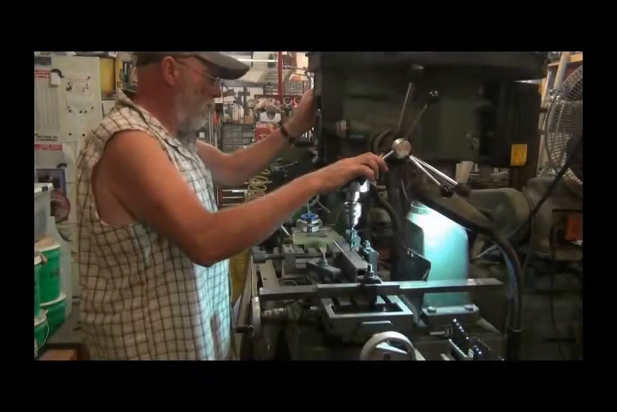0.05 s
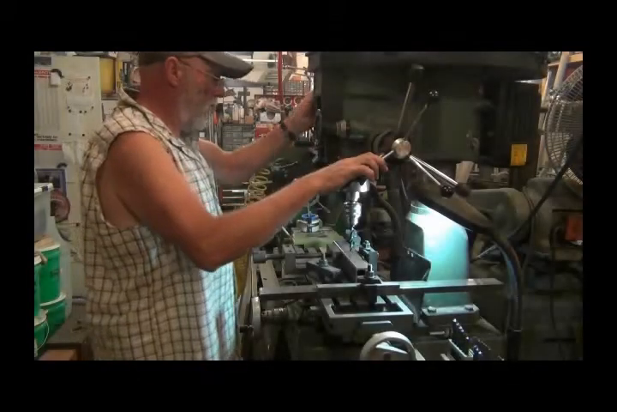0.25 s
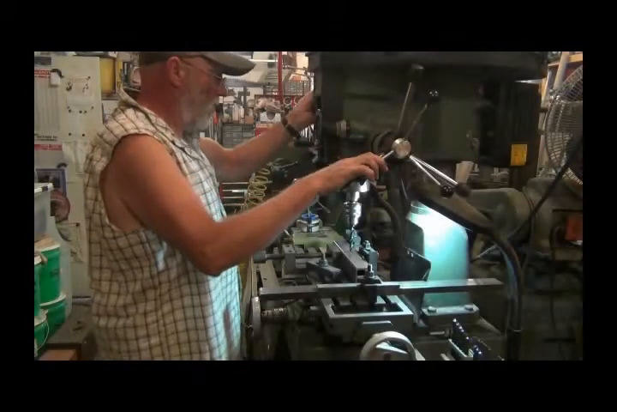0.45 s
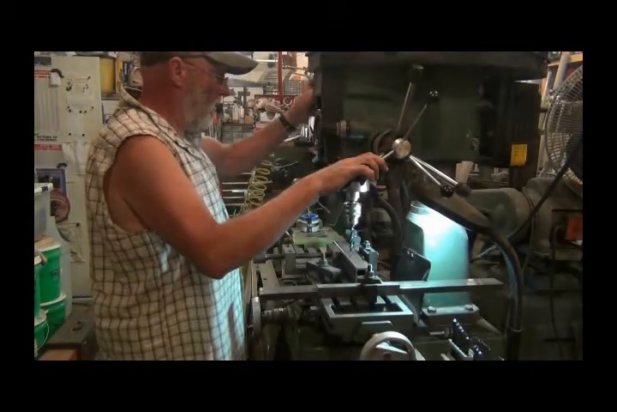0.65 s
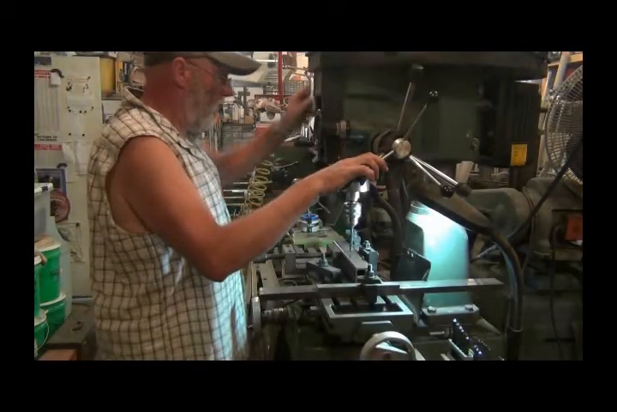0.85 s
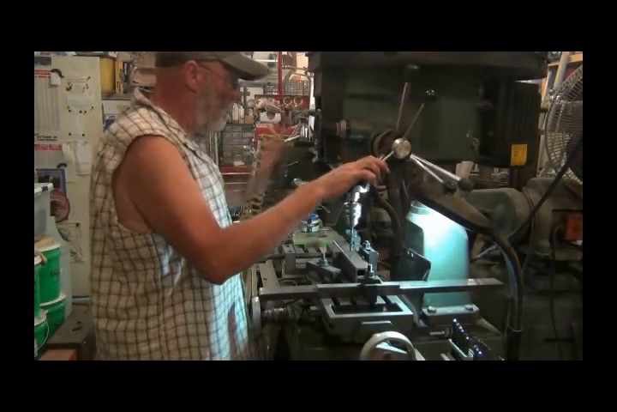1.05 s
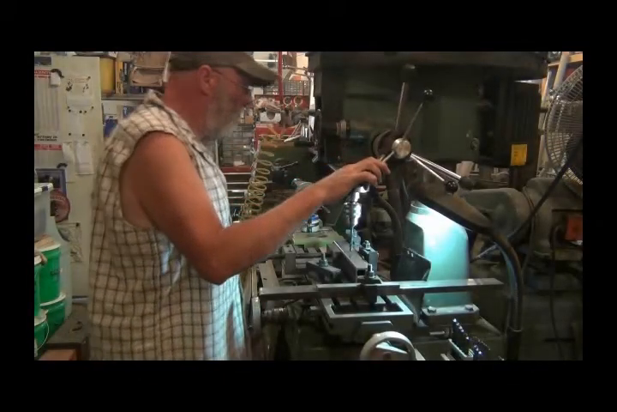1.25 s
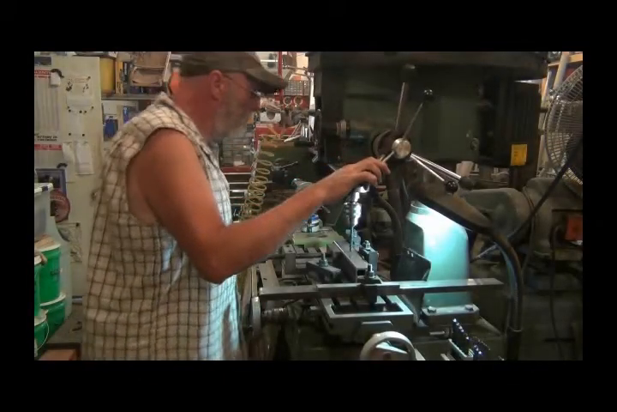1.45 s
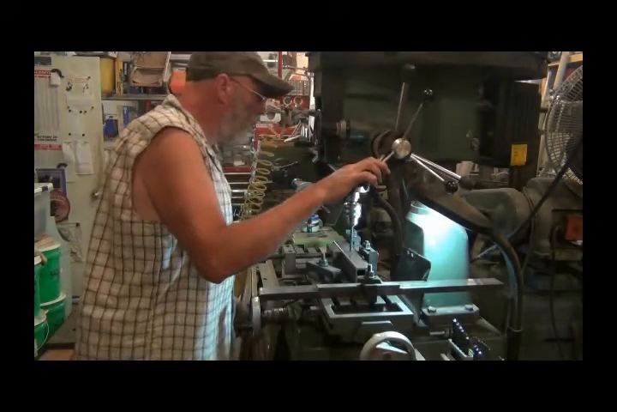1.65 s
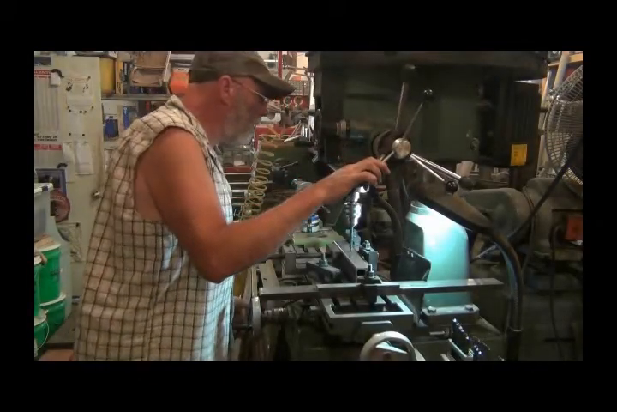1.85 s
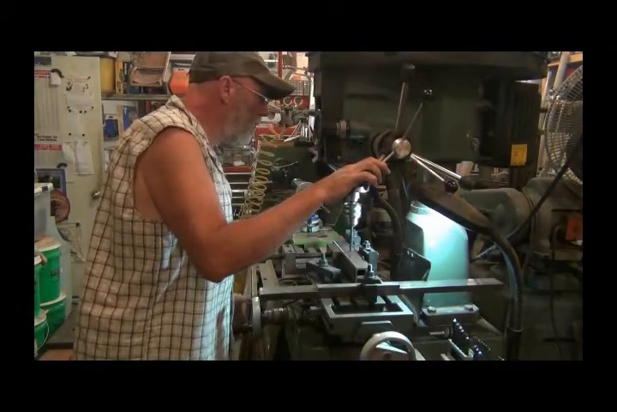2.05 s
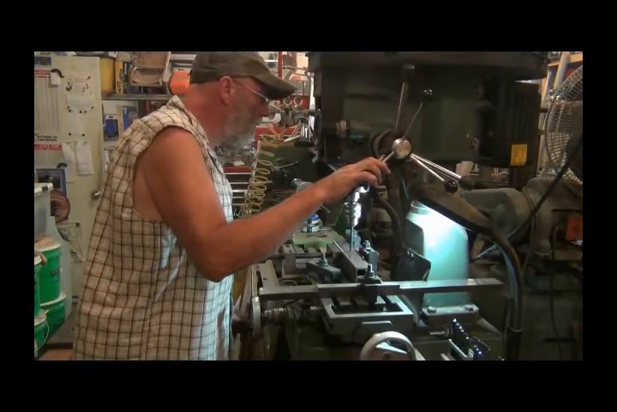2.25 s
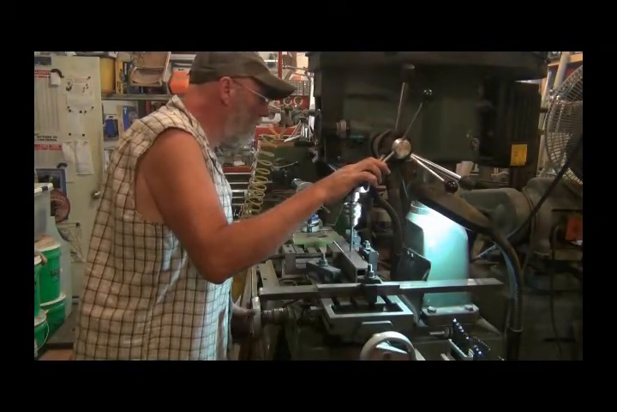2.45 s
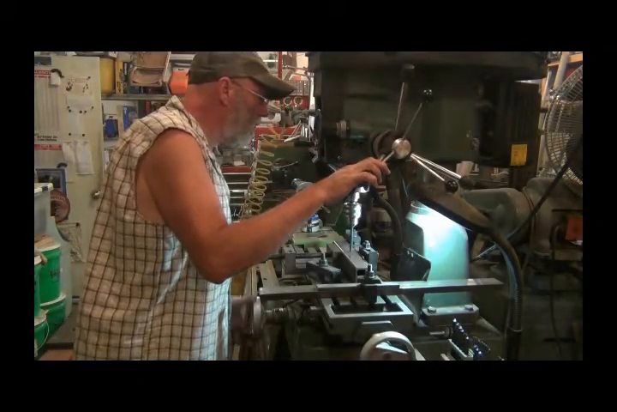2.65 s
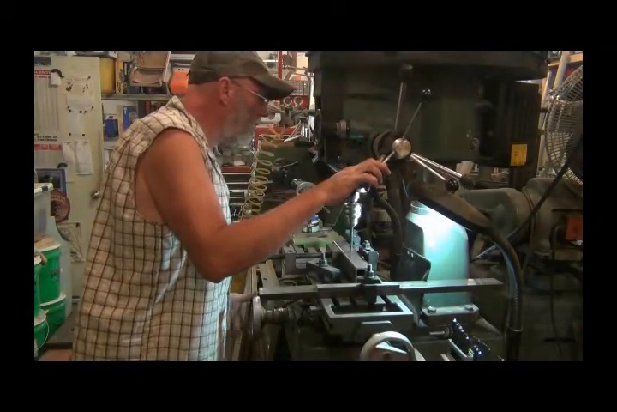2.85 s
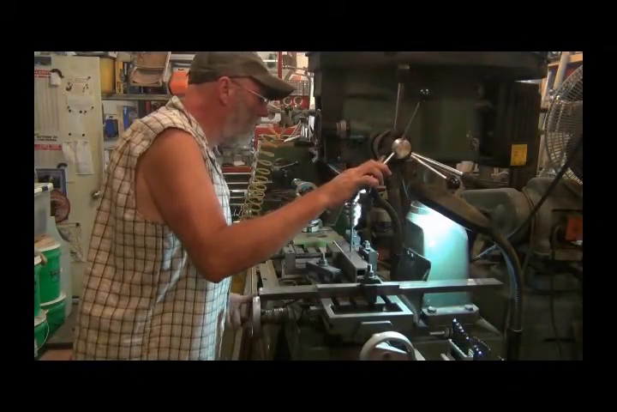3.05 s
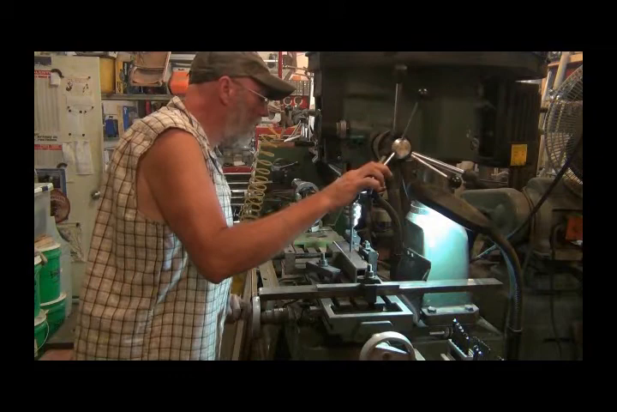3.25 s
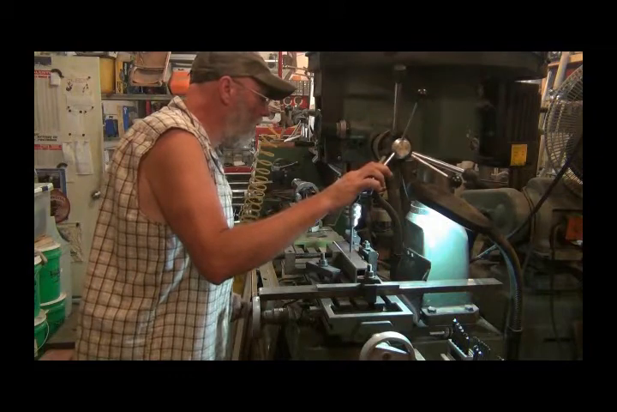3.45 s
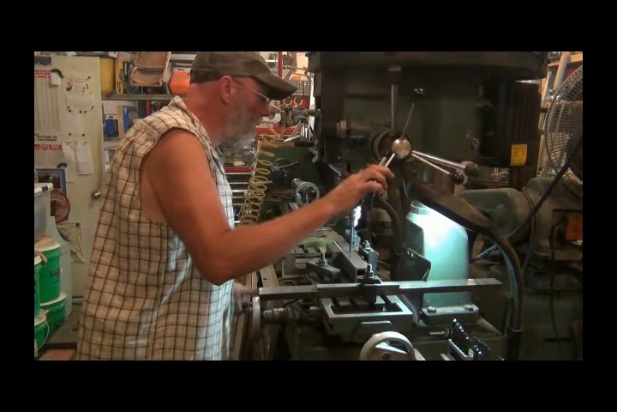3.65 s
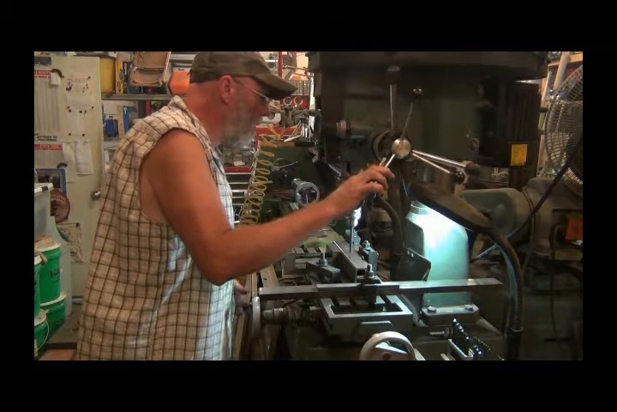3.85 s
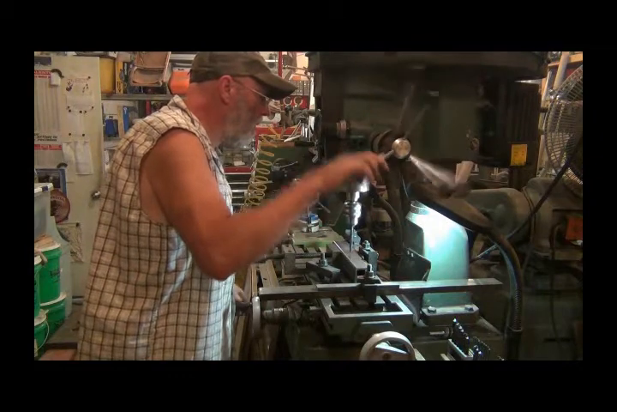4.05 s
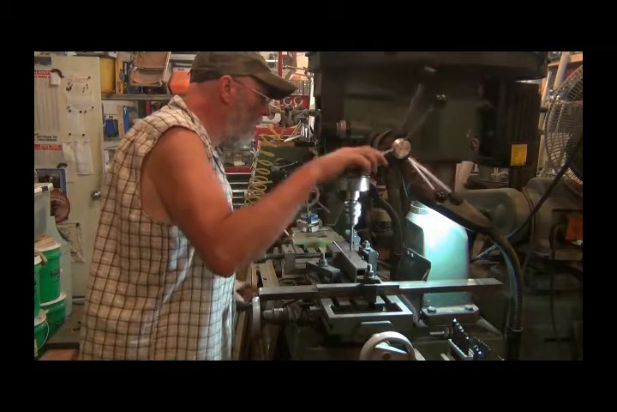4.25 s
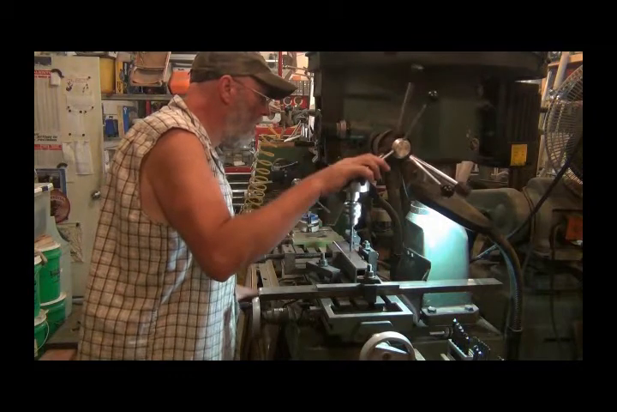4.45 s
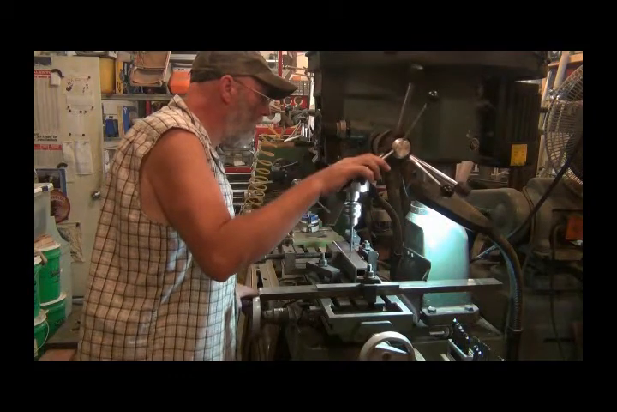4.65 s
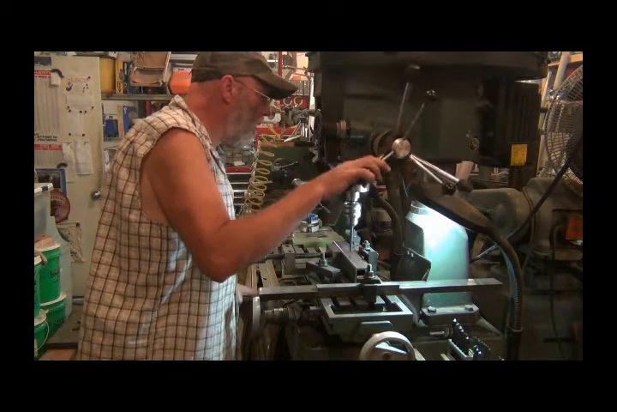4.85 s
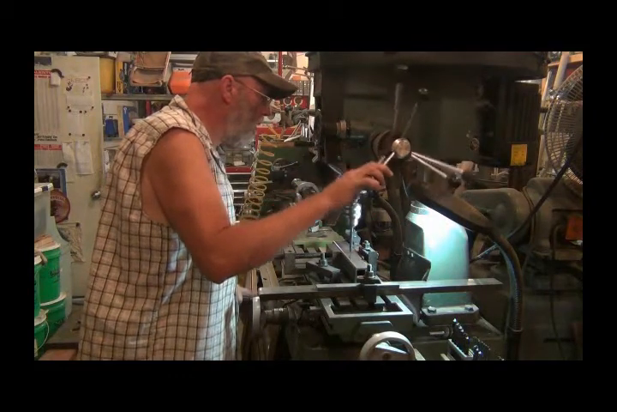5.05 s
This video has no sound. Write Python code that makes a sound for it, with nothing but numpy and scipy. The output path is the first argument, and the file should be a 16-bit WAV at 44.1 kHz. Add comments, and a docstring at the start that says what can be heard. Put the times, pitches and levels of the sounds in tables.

```python
"""A hand scuffs the sheet-steel cover of a belt-driven drill in a cluttered workshop; the switch and starter clack.
Then the windings hum at even mains multiples, and noise through resonances makes the cast frame rumble.
The belt whirrs as shaped noise; the loose spindle rattles each half turn as bursts that ring steel parts.
Soft gliding grunts, brief rising tones, a quiet shop and the echoes of its walls complete the scene."""
import sys
import numpy as np
from scipy import signal
from scipy.fft import rfft, irfft, next_fast_len
from scipy.io import wavfile
from scipy.ndimage import uniform_filter1d

SR = 44100
rng = np.random.default_rng(int(sys.argv[2]) if len(sys.argv) > 2 else 0)


def dump(signal):
    """Clip the signal to [-1, 1] and save it as 16-bit WAV at the path in sys.argv[1]."""
    limited = np.clip(np.atleast_2d(signal).T, -1, 1)
    pcm = np.round(limited * 32767).astype(np.int16)
    wavfile.write(sys.argv[1], SR, pcm)


N = 225703
T = np.arange(N) / SR  # time in s
MAINS_HZ, TURN_HZ = 59.98, 17.2  # supply frequency, spindle turns per second

# Resonances of the sheet cover. Each row: frequency in Hz, width in Hz, level in dB.
COVER = [(676, 32, 3), (845, 110, 0), (1020, 64, 1.5), (1183, 16, 4), (1333, 40, -6), (1470, 100, -4.5)]
# Steel parts that ring when struck. Each row: frequency in Hz, width in Hz, level in dB.
STEEL = [(2860, 310, -2), (4606, 166, 6.5), (5270, 300, 2.5), (6370, 590, 1.5), (7630, 900, -4),
         (9160, 510, 0), (10160, 490, -5), (11070, 1170, -6)]
# A fingertip tick, then switch and starter. Each row: start in seconds, level in dB,
# treble against that level in dB, decay by 60 dB in seconds.
CLACKS = [(0.207, -37.5, -11, 0.12), (0.7103, -17.5, -14.5, 0.3), (0.742, -23, -21, 0.16),
          (.874, -17, 3, 0.17), (0.885, -20, 4.5, 0.28)]


def undb(db):
    """Decibels are logarithmic: 20 dB is a tenfold amplitude gain."""
    return 10 ** (np.asarray(db) / 20)


def level(x, db):
    """Root-mean-square amplitude measures strength: scale x to db."""
    return x * undb(db) / np.sqrt(np.mean(x ** 2))


def colour(x, table, share=1):
    """Spectral shaping: weight the spectrum by (Hz, dB) points joined on a log-frequency axis."""
    hz, db = np.transpose(table)
    size = next_fast_len(N + SR // 4)
    log_f = np.log(np.arange(size // 2 + 1) * SR / size + 1)
    gain = undb(share * np.interp(log_f, np.log(hz), db))
    return irfft(rfft(x, size) * gain, size)[:N]


def ring(x, modes):
    """Modal superposition: resonances (Hz, width Hz, dB) in parallel, with alternating sign."""
    total = 0
    for k, (hz, width, db) in enumerate(modes):
        b, a = signal.iirpeak(hz, hz / width, SR)
        total = total + (-1) ** k * undb(db) * signal.lfilter(b, a, x)
    return total


def walk(rate):
    """Slow random fluctuation: levels held 1 / rate s and averaged twice; spread near 1."""
    k = int(SR / rate)
    held = np.repeat(rng.standard_normal(N // k + 1), k)
    return 1.447 * uniform_filter1d(uniform_filter1d(held, k), k)[:N]


def grit(spread_db):
    """Impulsive contact noise: dense clicks of uneven size."""
    size_db = spread_db * rng.exponential(1, N)
    return level(rng.standard_normal(N) * undb(size_db), 0)


def bursts(times, db, rise_s, t60_s):
    """Transient envelope: blows build over rise_s, then decay exponentially by 60 dB in t60_s."""
    out = np.zeros(N)
    for s, gain, t60 in zip(*np.broadcast_arrays(times, undb(db), t60_s)):
        i = int(s * SR)
        u = T[:min(N - i, int(1.5 * t60 * SR))]
        decay = np.exp(-np.log(1000) * u / t60)
        out[i:i + len(u)] += gain * (1 - np.exp(-u / rise_s)) * decay
    return out


def curves(table, before_db=-90):
    """Linear interpolation in dB: columns against time, fading in just ahead of the first row."""
    s, *columns = np.transpose(table)
    times = np.r_[s[0] - .006, s]
    return [np.interp(T, times, np.r_[before_db, column]) for column in columns]


def shop():
    """Stationary background: shaped noise for air and hiss, a lamp ballast at twice the mains."""
    # Spectrum of the quiet shop. Each row: frequency in Hz, density in dB per Hz.
    shop_spectrum = [(30, 0), (60, -8), (120, -10), (220, -2), (480, -4), (900, -5), (1400, -7),
                     (2700, -14.5), (10800, -19.5), (12500, -19)]
    air = level(colour(rng.standard_normal(N), shop_spectrum), -54.5)
    ballast = level(np.sin(4 * np.pi * MAINS_HZ * T), -67.5)
    return air + ballast


def walls(x):
    """Diffuse reverberation: convolve with exponentially decaying noise."""
    t60_s, first_echo_s = 0.3, .004
    u = T[:int(t60_s * SR)]
    decay = np.exp(-np.log(1000) * u / t60_s)
    tail = rng.standard_normal(len(u)) * decay * (u > first_echo_s)
    return signal.fftconvolve(x, tail / np.sqrt(np.sum(tail ** 2)))[:N]


def swept():
    """Frequency sweep under a bell-shaped envelope: brief rough tones that climb slightly."""
    # Brief rough tones, four early and one while running. Each row: centre in seconds,
    # frequency there in Hz, level in dB, spread in seconds.
    brief_tones = [(.772, 580, -21.5, 0.013), (.85, 689, -23.5, 0.026), (.895, 530, -22.5, 0.0065),
                   (0.418, 1090, -42, 0.0075), (3.055, 720, -27.5, 0.011)]
    rough = undb(3 * walk(110))
    tones = np.zeros(N)
    for at, hz, db, spread in brief_tones:
        u = T - at
        swell = np.exp(-(u / spread) ** 2 / 2)
        tones += undb(db) * swell * np.sin(2 * np.pi * hz * u * (1 + 0.39 * u))
    return rough * tones


def scuff():
    """Stick-slip friction: grains under the palm ring the cover; strokes swell, hold and fade."""
    # Strokes of the hand. Each row: full at in seconds, hold in seconds, level in dB,
    # rise in dB per second, fall in dB per second, treble against that level in dB.
    hand_strokes = [(0, 0.024, -43, 400, 179, -28), (.245, 0.036, -54, 300, 502, -6),
                    (0.439, 0.061, -42.5, 300, 190, -28), (.6, .06, -64, 150, 202, -20)]
    at, hold, db, rise, fall, treble_db = np.transpose(hand_strokes)[:, :, None]
    drop_db = np.maximum(np.maximum(rise * (at - T), fall * (T - at - hold)), 0)
    strokes = undb(db - drop_db) * (T < CLACKS[1][0])  # silent once the switch clacks
    grains = grit(2.8) * undb(0.96 * walk(118.0))
    body = level(ring(ring(grains, COVER), [(1010, 2900, 0)]), 0)
    treble = level(ring(grains, [(2400, 1200, 0)]), -0.41)
    return strokes.sum(axis=0) * body + (strokes * undb(treble_db)).sum(axis=0) * treble


def start():
    """Impact excitation: a tick, then switch and starter clacks, ring box, cover and steel."""
    # Resonances of the switch box. Each row: frequency in Hz, width in Hz, level in dB.
    switch_box = [(1140, 220, 1.5), (1380, 190, 3.5), (1930, 270, -5), (2510, 240, -0.5), (3080, 200, -10),
                  (5130, 210, -7)]
    s, db, treble_db, t60 = np.transpose(CLACKS)
    force = grit(1.7)
    plates = level(ring(force, COVER), -13.5) + level(ring(force, switch_box), -13.0)
    body = plates * bursts(s, db, 0.0013, t60)
    snap = ring(force * bursts(s, db + 3.0, .0003, 0.011), switch_box)  # the first hard contact
    treble = level(ring(grit(0.9), STEEL), -7.0) * bursts(s, db + treble_db, 0.0016, 0.67 * t60)
    return body + snap + treble


def grunts():
    """Pulsed forcing: a passing belt lump pushes the frame; the tone glides up as the belt tightens."""
    # Lumps passing the pulley. Each row: start in seconds, relative level in dB, nominal tone in Hz.
    lumps = [(1.489, -26, 513), (1.757, -22, 594), (1.91, -19, 516), (2.136, -25, 538), (2.74, -18, 580),
             (2.854, -14.5, 524), (3.014, -17, 475), (3.03, -14.5, 527), (3.945, -19, 506),
             (4.117, -20, 528), (4.365, -22, 571), (4.696, -19, 538), (4.771, -20, 506)]
    out = np.zeros(N)
    u = T[:int(.08 * SR)]
    swell = (u / 0.012) * np.exp(1 - u / 0.0069)
    phases = 2 * np.pi * rng.random(len(lumps))
    for (s, db, hz), phase in zip(lumps, phases):
        push = swell * np.sin(2 * np.pi * hz * u * (.94 + 1.68 * u) + phase)
        i = int(s * SR)
        out[i:i + len(u)] += undb(db - 2.0) * push[:N - i]
    return out


def orders():
    """Rotational orders: bumps repeat each turn; slip makes pitch and strength waver."""
    # Tones locked to the turn. Each row: multiple of the spindle turn, level against rumble in dB.
    order_levels = [(6, -27.5), (9, -20), (11, -19), (13, -20), (17, -13.5), (18, -20), (25, -20.5),
                    (30, -18.5), (34, -21), (40, -18.5)]
    turn = 2 * np.pi * TURN_HZ * np.cumsum(1 + .005 * walk(4)) / SR
    total = np.zeros(N)
    for k, db in order_levels:
        total += np.sqrt(2) * undb(db + 3.4 * walk(6)) * np.sin(round(k) * turn + k * k)
    return total


def knock_envelope():
    """Periodic impact: a slack spindle knocks each half turn, alternately stronger on average."""
    # Rattles placed one by one, some loud, some faint. Each row: time in seconds, level in dB.
    rattles = [(1.0631, -30), (1.1135, -29.5), (1.1983, -30), (1.5475, -26), (1.7475, -21), (1.8059, -24),
               (1.8643, -22), (1.9206, -23.5), (1.9835, -20), (2.1607, -18.5), (2.2788, -30),
               (2.438, -22.5), (2.5003, -26.5), (2.6145, -25), (2.7325, -21), (2.85, -21), (2.9069, -26),
               (2.9657, -26.5), (3.1409, -29), (3.3399, -33), (3.4556, -28), (3.5958, -27), (3.6582, -26),
               (3.772, -20), (3.833, -24), (3.8906, -23), (3.947, -27), (4.0069, -24), (4.065, -18.5),
               (4.441, -21.5), (4.5886, -27), (4.6404, -28), (4.7, -18.5), (4.8145, -22.5)]
    s, db = np.transpose(rattles)
    turn_at_s = 1.7475  # a knock that sets the beat
    beats = turn_at_s + np.arange(-26, 116) / (2 * TURN_HZ)
    chance = rng.standard_normal((len(beats), 2))
    beat_db = -30 + 1.3 * (-1) ** np.arange(len(beats)) + 2.5 * chance[:, 1]
    placed = bursts(s - .003, db, 0.004, 0.12)
    return placed + bursts(beats + 0.0034 * chance[:, 0], beat_db, 0.0018, .1)


def spindle(whirr_db, knocks):
    """Broadband noise and struck modes: belt and fan whirr, a fine rattle, and knocks on steel."""
    # Spectrum of the whirr. Each row: frequency in Hz, density in dB per Hz.
    whirr_spectrum = [(1180, -3), (2000, -2.5), (2890, 3), (3950, 1), (5360, 2), (6060, 1), (9360, -6),
                      (11800, -11.5), (12100, -6), (12400, -47), (16100, -77), (22000, -120)]
    force = grit(0.95)
    steel = level(ring(force, STEEL), -5.5) + level(colour(force, whirr_spectrum), -10.5)
    whirr = level(colour(rng.standard_normal(N), whirr_spectrum), -.5)
    whirr = whirr * undb(whirr_db + .6 * walk(25))
    # a fine rattle that follows the whirr between the knocks too
    chatter = level(ring(grit(1.1), STEEL[1:3]), -10) * undb(whirr_db + 2.8 * walk(20))
    return whirr + chatter + knocks * steel


def rumble(db, bass_db, groan_db, throb):
    """Forced vibration: bearing and belt forces raise a broad roar and modes that swell one by one."""
    # Spectrum of the roar. Each row: frequency in Hz, density in dB per Hz.
    roar_spectrum = [(30, -46), (62, -56), (90, -34), (130, -32), (200, -11.5), (340, -14), (520, -11.5),
                     (1000, -12), (1300, -10.5), (2100, -17), (4000, -29), (6000, -41)]
    # Resonances of frame and cover. Each row: frequency in Hz, width in Hz, level in dB.
    frame_modes = [(187.7, 17, -0.5), (224.4, 26.4, 3.5), (263, 12, -1.5), (317, 18, -2.5), (430, 20, -1),
                   (459.4, 17.5, -2), (499, 9.2, -3), (530.4, 23, -1.5), (595.5, 34.6, 2), (680, 9.3, 0),
                   (777, 63, -2), (1014, 66, -18.5), (1184, 37, -15.5), (1276, 50, -2.5), (1664, 190, -13),
                   (2582, 77, -10.5)]
    # Lower and upper edge of the groan in Hz.
    groan_from, groan_to = (480, 560)
    bass_top_hz = 330
    broad = level(colour(grit(0.89) * undb(0.73 * walk(60)), roar_spectrum), -2.05)
    low_pass = signal.butter(2, bass_top_hz, fs=SR, output="sos")
    broad_low = signal.sosfiltfilt(low_pass, broad)
    low, groan, high = np.zeros((3, N))
    for mode in frame_modes:
        hz, width, _ = mode
        narrow = ring(rng.standard_normal(N), [mode])
        tone = undb(1.6 * walk(9)) * ring(narrow, [(hz, 6.0 * width, 0)])
        if hz < bass_top_hz:
            low += tone
        elif groan_from < hz < groan_to:
            groan += tone
        else:
            high += tone
    shake = broad - broad_low + level(high, -6) + undb(groan_db) * level(groan, -1.6)
    # the heavy casting takes a moment to start moving, so the bass has its own course
    bass = undb(bass_db) * (level(low, 0.69) + undb(12.0) * broad_low)
    orders_fade = np.clip((T - .85) / 0.18, 0, 1)
    return undb(db) * (shake * (1 + 3.3 * throb) + bass + orders_fade * orders())


def hum(db):
    """Magnetic pull at even mains multiples; standing waves make it differ from left to right."""
    # Hum partials. Each row: multiple of the mains, relative level in dB,
    # left minus right in dB, lead of the right in radians.
    partials = [(2, -22, 0, 0.18), (4, 1, -2, 0.6), (6, -24.5, 15, 0.25), (12, -21.5, -4, 0.39)]
    side = np.array([[1], [-1]]) / 2
    total = np.zeros((2, N))
    for k, partial_db, pan, lead in partials:
        phase = 2 * np.pi * k * MAINS_HZ * T - lead * side + k
        total += undb(partial_db + pan * side) * np.sin(phase)
    return undb(db) * np.sqrt(2) * total


def motor():
    """Load-dependent excitation: dB of hum, rumble, bass, groan and whirr run up, then follow the load."""
    # Run-up. Each row: time in seconds, then hum, frame rumble and whirr in dB.
    run_up = [(.712, -64, -54, -45), (.738, -57, -33, -39.5), (.755, -52, -28.5, -41),
              (.8, -56, -29, -46.5), (.86, -31, -28, -35.5), (.9, -33, -25.5, -35.5),
              (.95, -23, -28.5, -29.5), (1.02, -39, -27.5, -38), (1.07, -27.5, -30.5, -39.5)]
    # Load on the drive. Each row: time in seconds, load against the usual in dB,
    # groan against rumble in dB.
    load = [(1.15, -3, -13), (1.4, -1, -16), (1.48, 0, -2), (1.7, 2, -4), (2.15, 0.4, -7.5),
            (2.3, -.5, -12), (2.7, 0, -8), (3.05, 0, -8.5), (3.6, 0, -5.5), (3.72, -1, -12),
            (4.28, 1.1, -15.5), (4.62, -0.9, -6.5), (4.81, 1.3, -11), (5.0, -1.6, -3), (5.12, -1.5, -16)]
    # Hum, frame rumble and whirr at the usual load, in dB.
    running_db = (-27, -28, -35.5)
    # Response of hum, rumble and whirr, in dB per dB of load.
    load_shares = (0.14, 0.83, 1.55)
    # Extra bass at the start in dB, and the time constant of its decay in seconds.
    surge_db, settle_s = (1.3, .4)
    steady = [(s, *(np.array(running_db) + load_db * np.array(load_shares))) for s, load_db, _ in load]
    hum_db, rumble_db, whirr_db = curves(run_up + steady)
    hum_db = hum_db + .6 * walk(13) * (T > load[0][0])  # wavers once run up

    load_s, load_db, groan_points = np.transpose(load)
    since = T - .748  # s from the full onset of the bass
    surge = surge_db * np.exp(-np.maximum(since, 0) / settle_s)
    onset = 2500 * np.minimum(since, 0)  # steep rise, dB per s
    bass_db = -7.5 + surge + onset  # against the rumble
    # the bass follows the load less than the rest of the rumble
    bass_db = bass_db - .7 * np.interp(T, load_s, load_db) + 1.6 * walk(12)
    groan_db = np.interp(T, load_s, groan_points) + 1.8 * walk(12)
    return hum_db, rumble_db, bass_db, groan_db, whirr_db


def scene():
    """Superposition: all sources and their echoes, with a small difference between left and right."""
    # Echoes of opposite sign left and right. Each row: frequency in Hz, level in dB.
    apart = [(60, -33), (150, -11.5), (350, -12.5), (1000, -10.5), (3000, -10.5), (4050, -9), (4250, -66)]
    # Balance of the direct sound. Each row: frequency in Hz, left minus right in dB.
    balance = [(110, -2.5), (200, -1.5), (600, -1), (2500, -.5)]
    balance = balance + [(4100, 0)]  # none in the treble
    room_db = -7.5
    hum_db, rumble_db, bass_db, groan_db, whirr_db = motor()
    knocks = knock_envelope()
    blows = spindle(whirr_db, knocks) + start() + scuff() + grunts()
    steady = rumble(rumble_db, bass_db, groan_db, knocks) + swept() + shop()
    mid = blows + undb(room_db) * walls(blows) + steady
    side = colour(walls(blows + steady), apart)
    left = colour(mid, balance, 1 / 2) + side
    right = colour(mid, balance, -1 / 2) - side
    return np.array([left, right]) + hum(hum_db)


def record(dry):
    """Band limiting: filters cut the deepest bass and the top of the spectrum."""
    bass_cut = signal.butter(3, 90, "high", fs=SR, output="sos")
    top_cut = signal.ellip(10, .2, 80, 12350, fs=SR, output="sos")
    return signal.sosfilt(top_cut, signal.sosfilt(bass_cut, dry))


dry = scene()
out = record(dry)
dump(out)
```